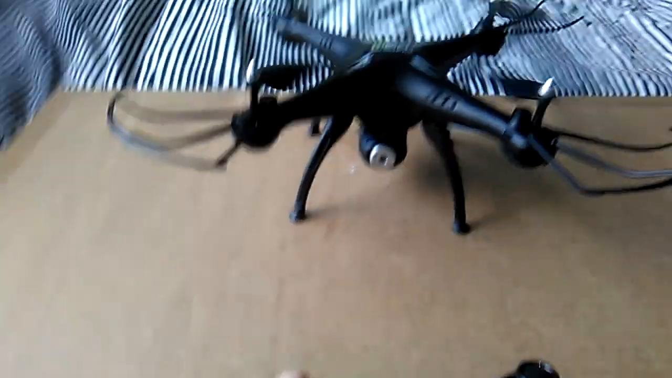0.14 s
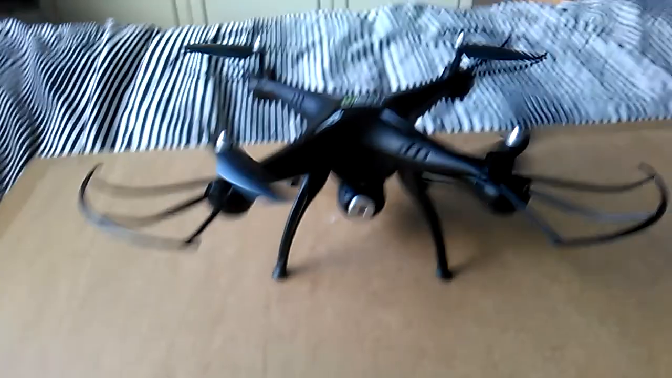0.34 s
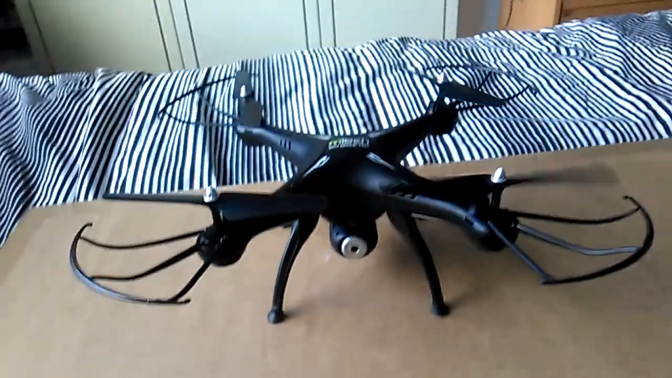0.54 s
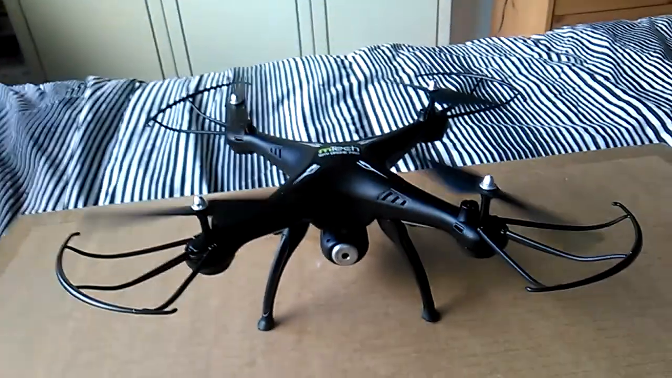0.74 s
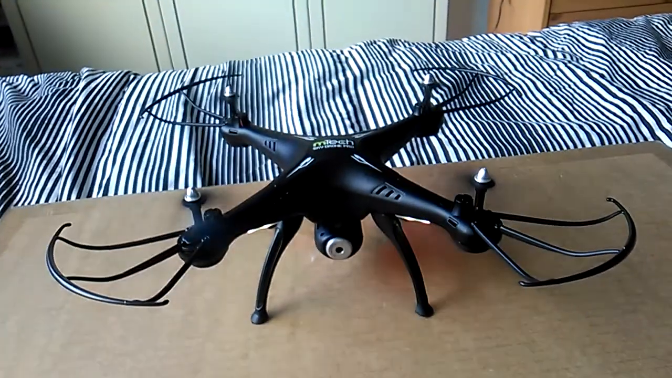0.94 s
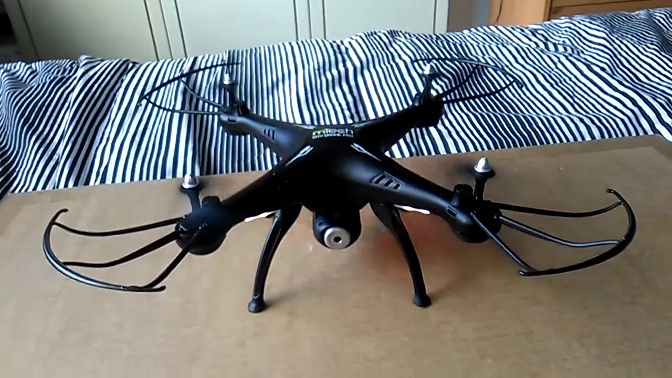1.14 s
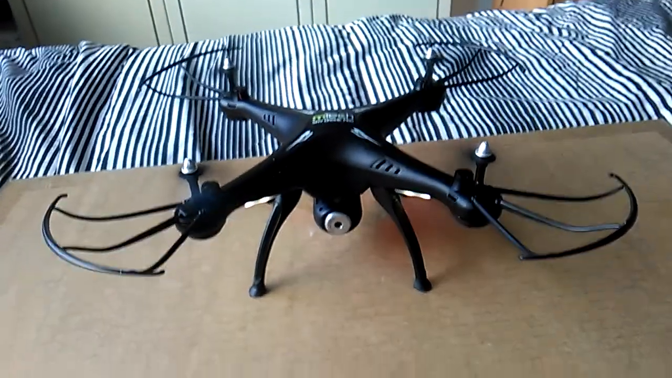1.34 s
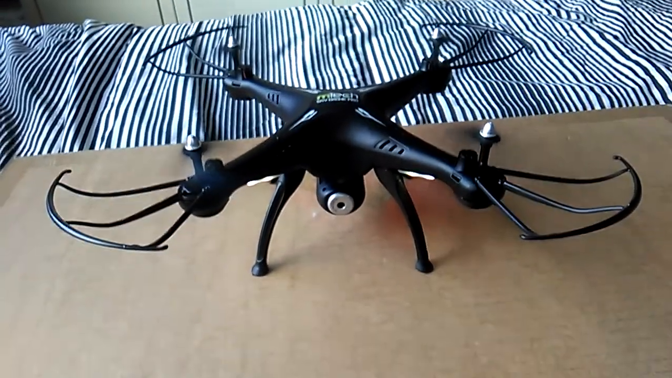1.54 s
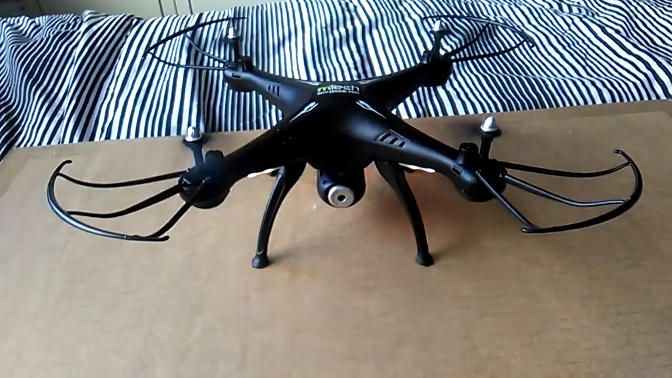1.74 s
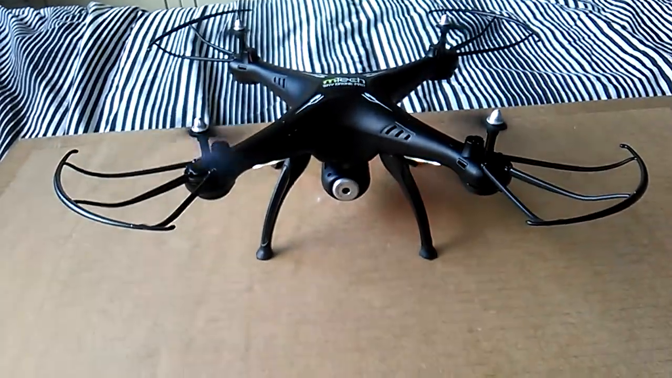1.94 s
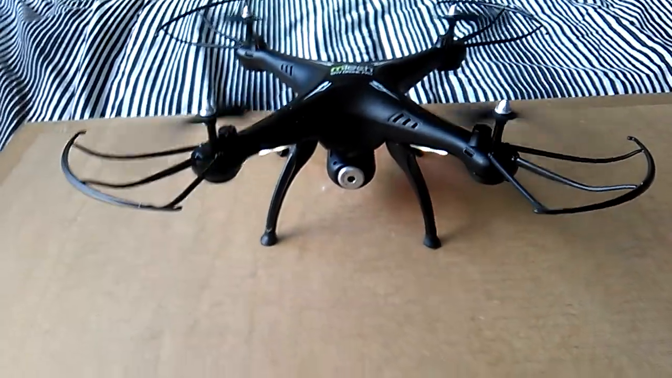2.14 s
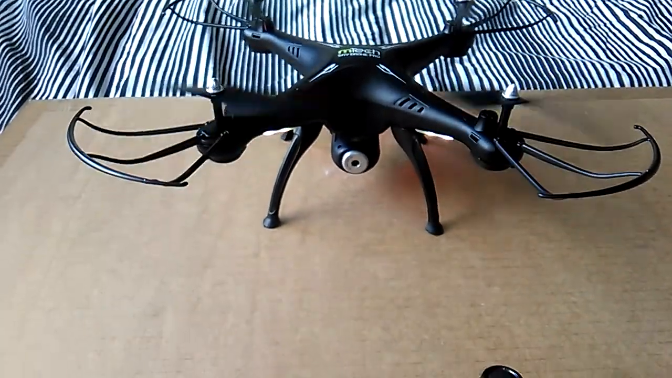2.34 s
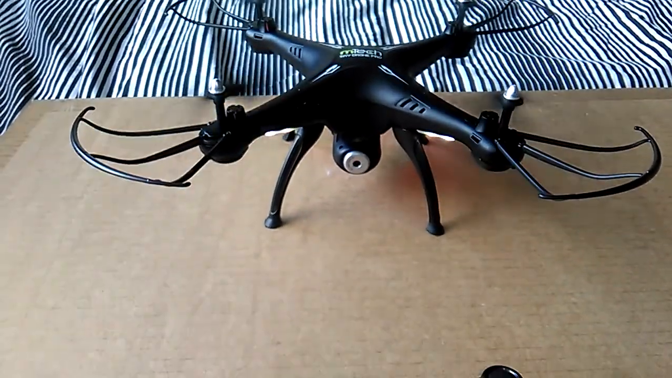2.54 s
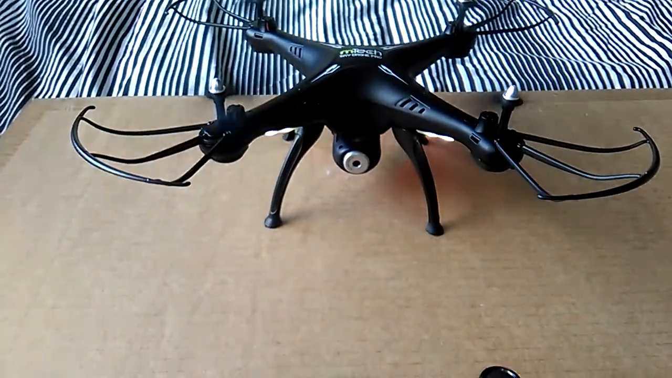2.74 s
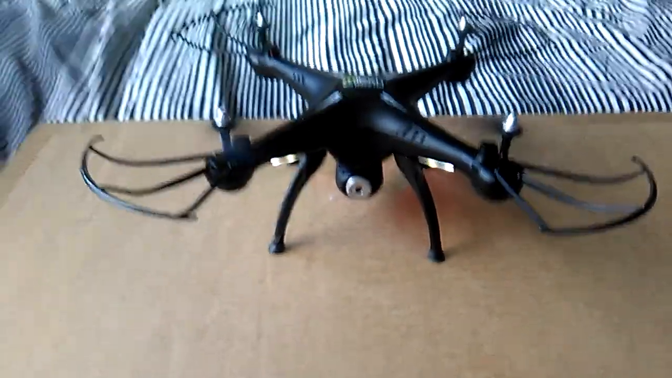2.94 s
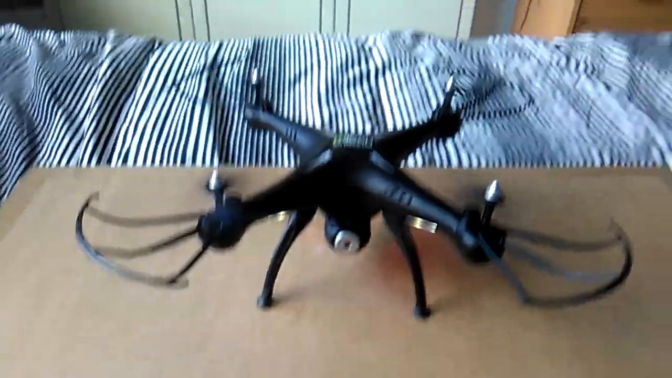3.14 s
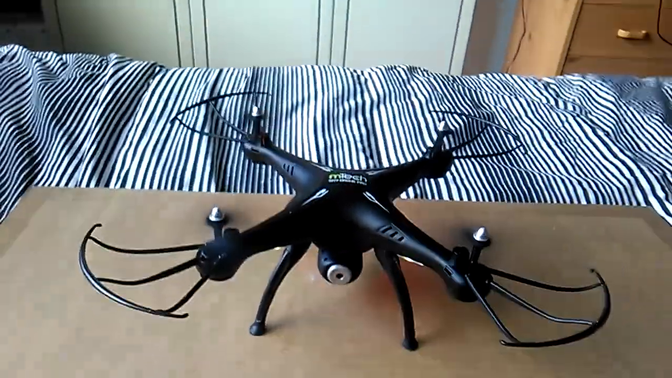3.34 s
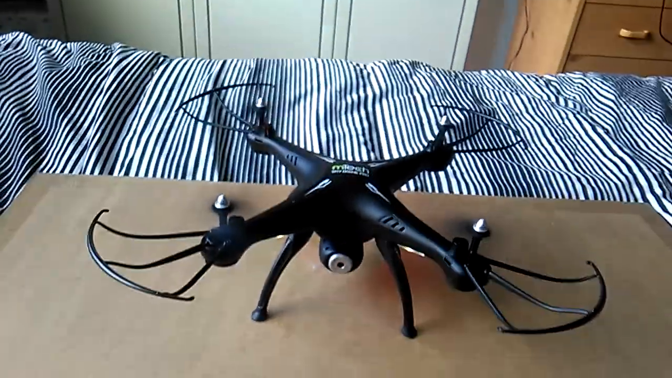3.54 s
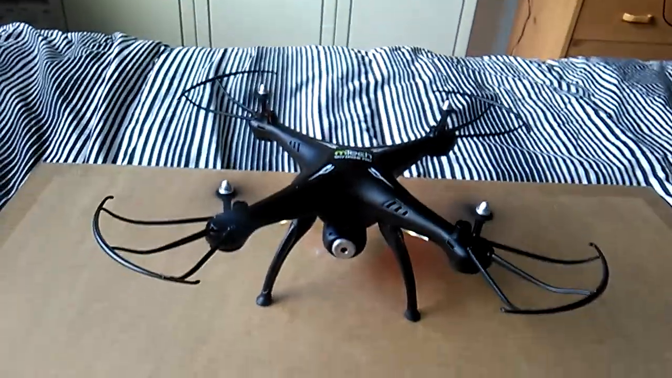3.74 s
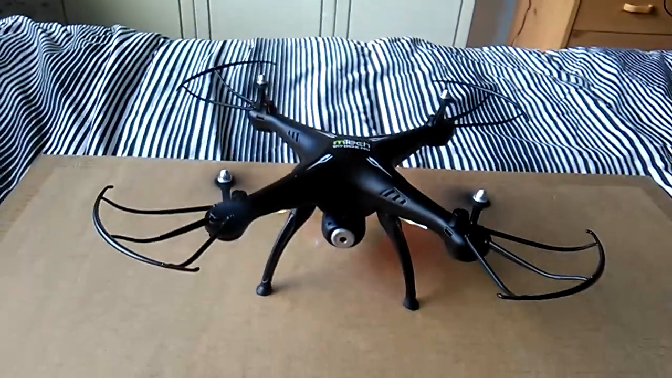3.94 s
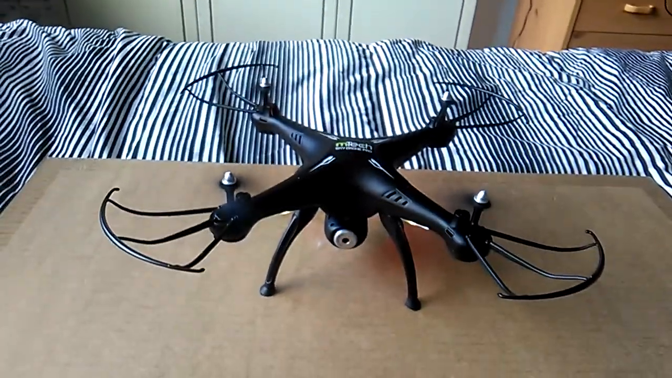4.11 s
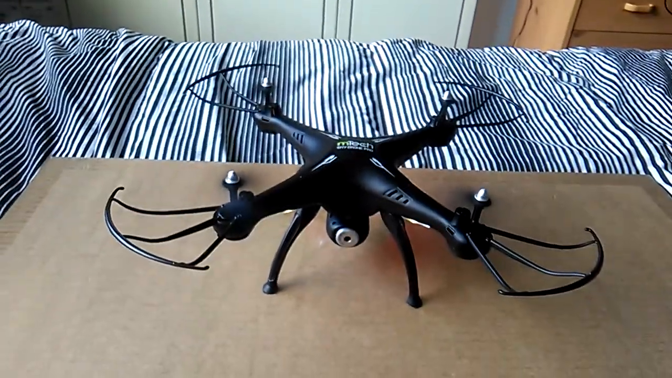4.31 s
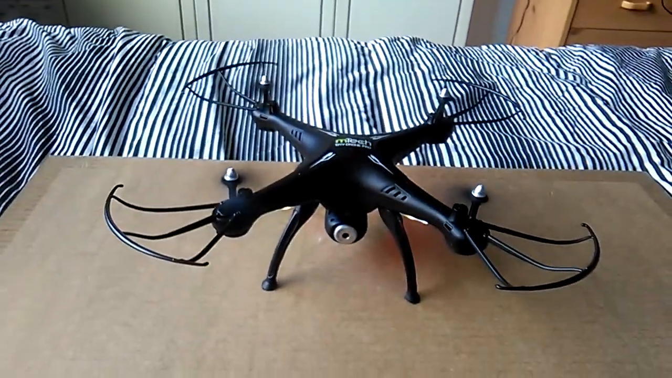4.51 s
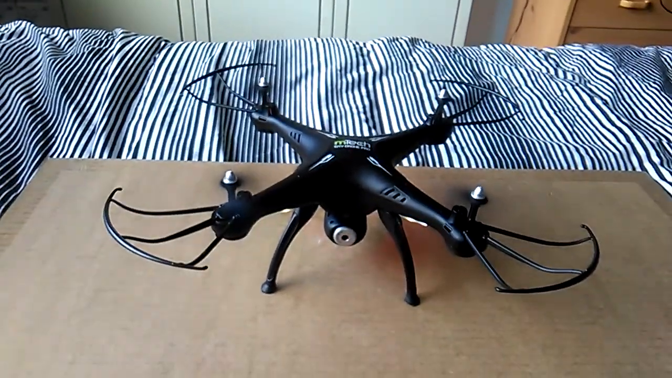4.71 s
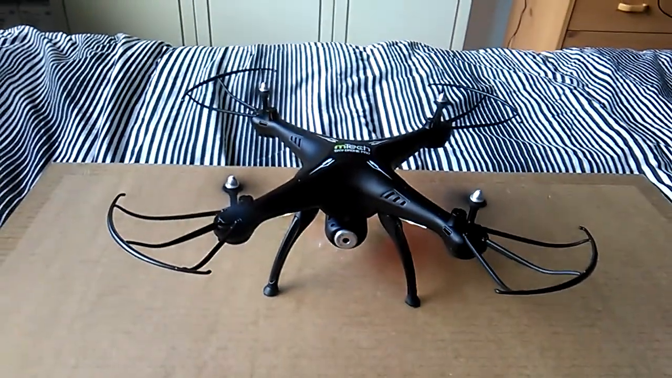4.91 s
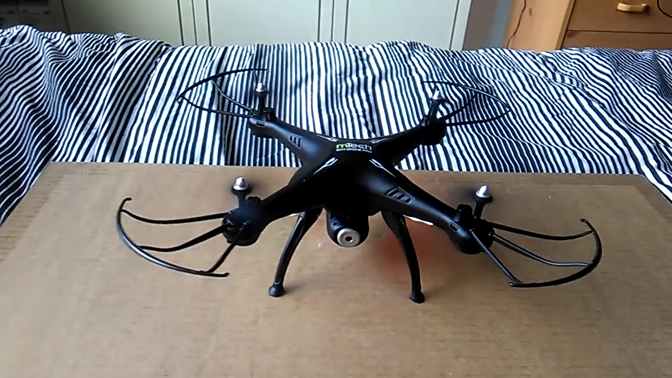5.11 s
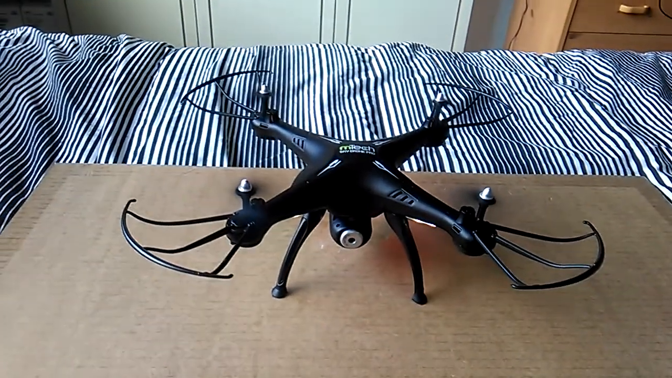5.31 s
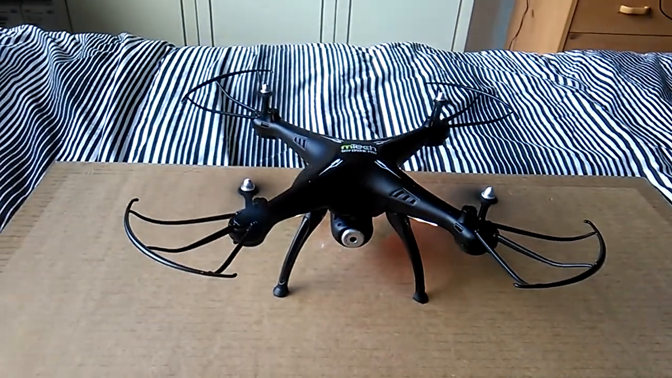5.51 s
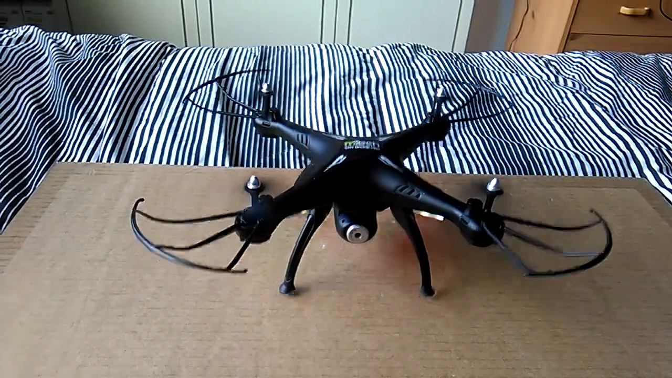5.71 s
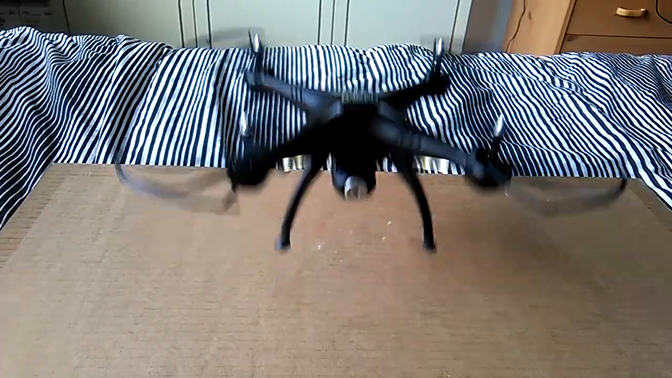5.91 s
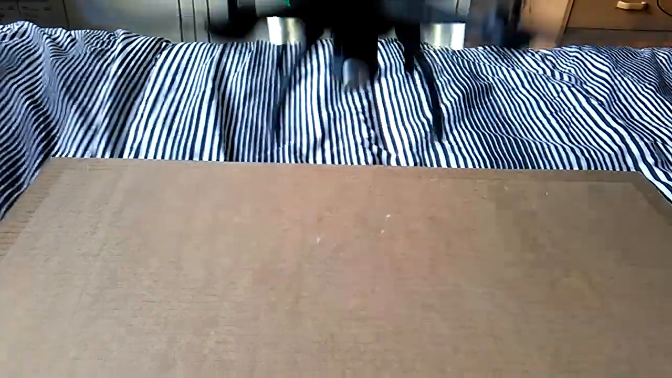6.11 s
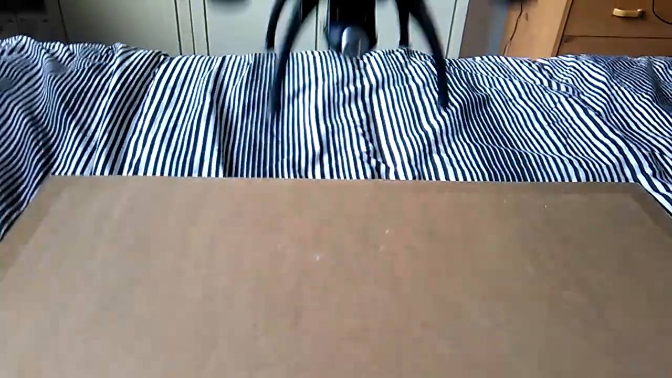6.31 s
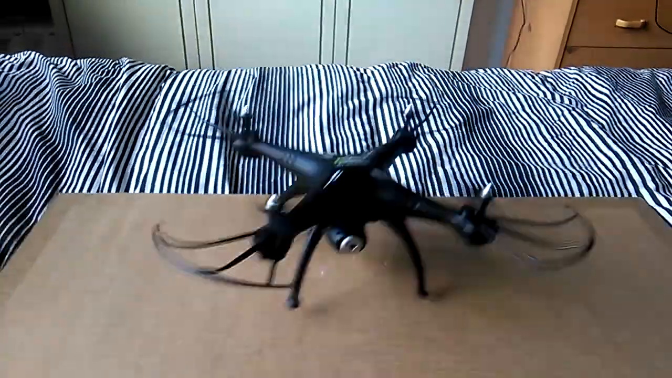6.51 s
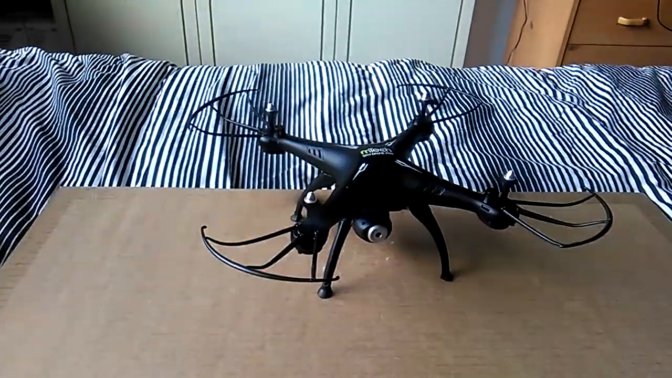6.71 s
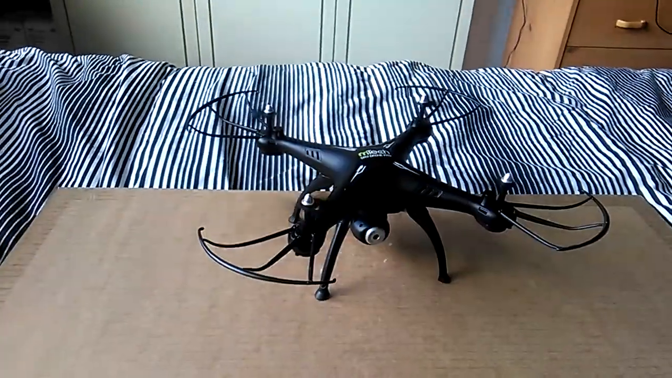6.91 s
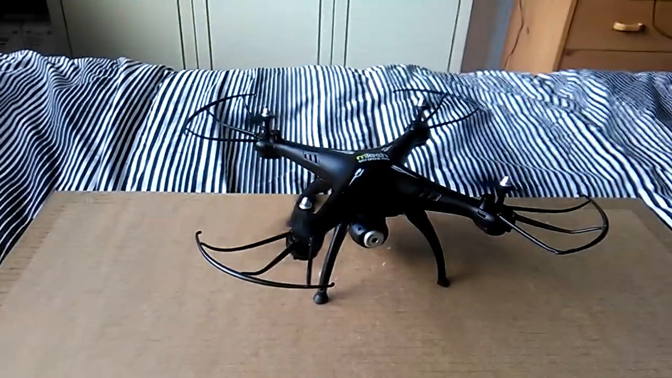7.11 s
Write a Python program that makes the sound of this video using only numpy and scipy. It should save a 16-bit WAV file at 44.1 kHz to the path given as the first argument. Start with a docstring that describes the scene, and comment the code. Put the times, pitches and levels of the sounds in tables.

```python
"""A toy quadcopter on a cardboard sheet, close to a phone: four small geared motors coast down, rev three times,
lift it off and drop it back. Gear teeth are uneven noise and their whine is sines on shaft multiples, both
coloured by the plastic frame; the blades hum and hiss. The sheet's modes rumble under the feet until they
leave it, and the landing is a run of noise bursts that ring those modes. Downwash and a faint hush lie below."""
import sys
import numpy as np
from scipy import signal
from scipy.fft import rfft, irfft
from scipy.io import wavfile
from scipy.ndimage import uniform_filter1d

SR = 44100
rng = np.random.default_rng(int(sys.argv[2]) if len(sys.argv) > 2 else 0)


def linear_from_db(decibels):
    """Turn decibels (scalar or array-like) into linear amplitude factors; 0 gives 1."""
    return 10 ** (np.asarray(decibels, float) / 20)


def wrap_up_sound(samples):
    """Save the sound to the file named by the first command line argument, as 16-bit audio."""
    columns = np.atleast_2d(samples).T
    # keep every value between -1 and 1, then stretch to whole-number steps
    tamed = np.clip(columns, -1, 1)
    steps = np.round(tamed * 32767).astype(np.int16)
    wavfile.write(sys.argv[1], SR, steps)


N = 315519
T = np.arange(N) / SR
LIFT_OFF_S, TOUCHDOWN_S = 6.08, 6.596
COASTING_DB = -15  # drive level without power

# single gear ticks, most as the gears slow or start, one in the third rev, one after touchdown,
# relative levels: start_s, tooth_db, sheet_knock_db
TICKS = [(0.036, -44, -30.5), (0.129, -34, -52), (0.169, -36, -37), (0.237, -34, -28), (0.3238, -42, -37),
         (0.399, -41, -55), (0.419, -44, -50), (0.461, -44, -60), (0.536, -37.5, -52), (0.589, -42, -63),
         (0.622, -51, -70), (0.657, -41, -67), (0.839, -27, -39.5), (0.845, -32, -53), (0.883, -31, -50),
         (2.358, -43, -55), (2.386, -32, -40), (2.419, -29, -58), (2.4944, -43, -60), (2.56, -29, -42),
         (5.2915, -13, -49), (6.787, -22, -49)]


def unit(x):
    """Scale to rms 1."""
    return x / np.sqrt(np.mean(x ** 2))


def along(table):
    """Columns of a curve over time, sample by sample."""
    s, *columns = np.transpose(table)
    return [np.interp(T, s, c) for c in columns]


def on_log(table):
    """A (Hz, value) table read at every FFT bin."""
    hz, value = np.transpose(table)
    return np.interp(np.log(np.fft.rfftfreq(N, 1 / SR) + 1), np.log(hz), value)


def by_speed(blade_hz, table):
    """A (blade rate Hz, dB) table read at the present speed."""
    hz, db = np.transpose(table)
    return np.interp(np.log(blade_hz), np.log(hz), db)


def law(blade_hz, cruise_db, db_per_doubling):
    """Level in dB that changes by a fixed step each time the speed doubles, from a cruise of 70 Hz."""
    return cruise_db + db_per_doubling * np.log2(blade_hz / 70)


def peaks(modes):
    """Complex response of a set of (Hz, width Hz, dB) resonances."""
    f = np.fft.rfftfreq(N, 1 / SR)
    return sum(linear_from_db(db) * 1j * f * w / (hz ** 2 - f ** 2 + 1j * f * w) for hz, w, db in modes)


def shape(x, gain):
    """Filter by a response over the FFT bins."""
    return irfft(rfft(x) * gain, N)


def noise(gain):
    """White noise through a response, scaled to rms 1."""
    return unit(shape(rng.standard_normal(N), gain))


def walk(rate):
    """Random levels of about unit rms, a new one every 1 / rate s, joined by straight slopes."""
    knots = rng.standard_normal(int(N / SR * rate) + 2)
    return 1.2 * np.interp(T * rate, np.arange(len(knots)), knots)


def blows(rows, length_s):
    """A noise burst at each (s, dB), falling by a factor e every length_s."""
    out, t = np.zeros(N), np.arange(int(0.026 * SR)) / SR
    for (s, db), burst in zip(rows, rng.standard_normal((len(rows), len(t)))):
        i = int(s * SR)
        out[i:i + len(t)] += linear_from_db(db) * burst * np.exp(-t / length_s)
    return out


def ring(x, modes):
    """Decaying (Hz, dB, t60 s) modes driven by x."""
    out = np.zeros(N)
    for hz, db, t60 in modes:
        pole = np.exp((2j * np.pi * hz - np.log(1000) / t60) / SR)
        out += linear_from_db(db) * signal.lfilter([1], [1, -pole], x).imag
    return out


def room_hush():
    """Soft, dark noise, independent at the two ports."""
    tone = [(60, -8), (200, 7), (1000, -6), (5000, -14), (8000, -22), (10500, -40), (12000, -55)]
    return linear_from_db(-74) * unit(shape(rng.standard_normal((2, N)), linear_from_db(on_log(tone))))


def downwash():
    """Deep rumble, probably downwash on the microphone; the sheet's boom after touchdown shares its noise."""
    # rumble before its slow drift: time_s, level_db
    wash_curve = [(0, -70), (.64, -69), (.7, -81), (1.0, -74), (1.62, -67), (2.28, -78), (3.2, -64),
                  (4.18, -52), (4.8, -57), (5.04, -49), (5.86, -54), (6.13, -57), (6.55, -58), (6.8, -72)]
    boom_db, boom_hold_s, boom_t60_s = -44, 0.1, 0.26
    after = T - TOUCHDOWN_S
    boom = (after > 0) * linear_from_db(boom_db - 60 * np.maximum(after - boom_hold_s, 0) / boom_t60_s)
    level = linear_from_db(along(wash_curve)[0] + 2.5 * walk(8)) + boom
    return level * noise(peaks([(55.4, 8.7, 15), (40.3, 26, -14)]) ** 2)


def part_ring():
    """A loose part buzzes on briefly once the gears have slowed: narrow noise bands that decay."""
    # loose part's bands: pitch_hz, level_db, t60_s
    part_modes = [(4420, -73, .5), (4743, -63, .3)]
    start_s, rise_s = 0.67, 0.006
    t = np.maximum(T - start_s, 0)
    rise = np.clip((T - start_s) / rise_s, 0, 1)
    bands = [linear_from_db(db - 60 * t / t60) * noise(peaks([(hz, 45, 0)]) ** 2) for hz, db, t60 in part_modes]
    return rise * sum(bands)


def clatter():
    """Guards and legs rattle after touchdown: mid-heavy noise that jitters as it decays."""
    start_db, t60_s = -18.5, 0.54
    after = T - TOUCHDOWN_S
    level = (after > 0) * linear_from_db(start_db - 60 * np.maximum(after, 0) / t60_s + 2.5 * walk(250))
    return level * noise(linear_from_db(on_log([(90, -5), (200, -1), (900, 6.5), (2000, -0.5), (5000, -6.0), (12000, -55)])))


def landing():
    """Feet thump the sheet into its modes, with a short crack of plastic and a clatter."""
    # feet meeting the sheet, relative levels: start_s, foot_db, crack_over_foot_db
    contacts = [(5.174, -22.5, -10), (6.5975, -4.5, -6.5), (6.603, -11, -15), (6.61, -8.5, -14),
                (6.617, -8, -18), (6.624, -12.5, -18), (6.631, -16, -20), (6.639, -15, -33),
                (6.661, -19, -22), (6.695, -21, -37), (6.708, -12, -30), (6.714, -17.5, -25),
                (6.722, -21, -25), (6.734, -23, -25), (6.749, -24, -30), (6.775, -28, -30),
                (6.869, -32, -27), (6.889, -37, -27), (7.094, -46, -33)]
    # sheet modes under the blow, relative levels: pitch_hz, level_db, t60_s
    thump_modes = [(71.6, -1, 0.2), (120, 1, 0.11), (206, -2, 0.12), (100, -8, 0.13), (332, -3, 0.066),
                   (443, -1, 0.11), (642, 7.5, 0.06), (740, 7.5, 0.065), (864, 7.5, 0.05),
                   (1026, 6.5, 0.04), (1280, -3, 0.04), (1583, -8, 0.072), (2200, -6, 0.093),
                   (2630, -16, .04)]
    feet_rows = [row[:2] for row in contacts]
    feet = blows(feet_rows, 0.0022)
    push = np.abs(blows(feet_rows, 0.00023))  # one-way, so it drives the low modes
    thump = 0.026 * ring(0.53 * feet + 0.8 * push, thump_modes)
    # the thump keeps little of its deepest bass, below about 60 Hz
    thump = shape(thump, linear_from_db(on_log([(35, -30), (60, -3), (75, 0), (20000, 0)])))
    crack = blows([(s, db + rel) for s, db, rel in contacts], 0.0027)
    crack = shape(crack, linear_from_db(on_log([(800, -19), (1600, 7.0), (3000, 10.0), (8000, -4.0), (15000, -16)])))
    return clatter() + thump + crack


def sheet_rumble(rattles, lead_hz):
    """Feet pass the shaking to the sheet: slow gears ring its modes, downwash at speed drums it broadly."""
    # rumble, which stops while the feet are off the sheet: time_s, relative_level_db
    rumble_curve = [(0, -45.5), (.24, -46.5), (.832, -70), (.838, -52.5), (.95, -38.5), (1.1, -34.5),
                    (1.74, -39.5), (2.38, -46), (2.53, -51.5), (2.67, -40), (4.06, -39), (4.13, -38),
                    (5.98, -39), (6.3, -67), (6.59, -83), (6.6, -17), (6.72, -37.5), (6.81, -47),
                    (7.15, -47.5)]
    # sheet resonances: pitch_hz, width_hz, relative_level_db
    sheet_modes = [(63.4, 13, -10), (162, 17, 6.5), (227, 26.3, 7), (507.8, 18.3, 3.5), (730, 18, -32)]
    level_db = along(rumble_curve)[0] + 2.0 * walk(16)
    rung = unit(shape(rattles.sum(0), peaks(sheet_modes)))
    drummed = noise(linear_from_db(on_log([(60, -61), (130, -3.5), (300, 2.5), (800, 9.5), (1400, 2.0), (2600, -53)])))
    share = np.clip(lead_hz / 560, 0, 1)
    return linear_from_db(level_db - 3.5) * (np.sqrt(1 - share) * rung + np.sqrt(share) * drummed)


def sheet_knocks():
    """Each single gear tick also knocks the sheet: a one-way push into two low resonances."""
    push = np.abs(blows([(s, sheet_db) for s, _, sheet_db in TICKS], 0.0013))
    return 30 * shape(push, peaks([(232, 31, -3.5)]) ** 2 + peaks([(153, 10, -14)]))


def arm_tone(rattles, rattle_db, blade_hz):
    """Gear rattle rings the arms in a narrow band, and one arm sings briefly as the frame settles."""
    # arm resonance: pitch_hz, width_hz, level_db
    arm_modes = [(1076.6, 260, 0)]
    on_s, off_s, sing_db, fade_s = 6.805, 6.872, -42, 0.0051
    over_rattle_db = law(blade_hz, -17.5, -2.5) + 1.27 * walk(14)
    rung = linear_from_db(rattle_db + over_rattle_db) * unit(shape(rattles.sum(0), peaks(arm_modes) ** 3))
    gate = np.clip(np.minimum(T - on_s, off_s - T) / fade_s, 0, 1)
    return rung + linear_from_db(sing_db) * gate * noise(peaks([(1099, 73, 0)]) ** 2)


def commutator_buzz(turns, drive_db):
    """Commutators buzz on low multiples of the shaft rates, through an arm resonance."""
    # commutator lines: motor_index, multiple_of_shaft_rate, relative_level_db
    buzz_lines = [(0, 2, 4.5), (1, 3, -1), (0, 5, 6)]
    lines = sum(linear_from_db(db + 2.0 * walk(11)) * np.sin(k * turns[round(m)]) for m, k, db in buzz_lines)
    return shape(linear_from_db(-41.5 + drive_db) * lines, 1.35 * peaks([(1079, 180, 0)]) ** 2)


def shaft_hum(turn, lead_hz, drive_db):
    """A sine at the leading shaft rate, lifted near the sheet's resonances and silent in the air."""
    # lifts by the sheet: pitch_hz, width_hz, relative_level_db
    shaft_peaks = [(232.5, 27.6, 12.6), (140, 14, 2.9)]
    start_hz, air_fade_s = 131, 0.056  # below start_hz the hum fades
    lift = 1 + sum(linear_from_db(db) / (1 + (2 * (lead_hz - hz) / w) ** 2) for hz, w, db in shaft_peaks)
    level = linear_from_db(-46 + drive_db + 2.5 * walk(12)) * lift / (1 + (start_hz / lead_hz) ** 8)
    airborne = np.clip(np.minimum(T - LIFT_OFF_S, TOUCHDOWN_S - T) / air_fade_s, 0, 1)
    return level * (1 - airborne) * np.sin(turn)


def blades(turn, drive_db):
    """One propeller's hum from the turning of its motor shaft; the overtones need load on the blades."""
    # harmonics: multiple_of_blade_rate, relative_level_db
    blade_orders = [(1, 0), (2, -12), (4, -8), (5, -10), (7, -9), (8, -13)]
    hum = np.zeros(N)
    for k, db in blade_orders:
        hum += linear_from_db(db + 1.9 * walk(14) + (k > 1) * drive_db) * np.sin(k * turn / 3 + k * k)
    return hum


def blade_hum(turns, blade_hz, drive_db):
    """Three propellers hum at a level that follows the leading rotor's speed, the leading one loudest."""
    # hum before drive and drift: blade_rate_hz, relative_level_db
    hum_curve = [(20, -88), (70, -63), (108, -46), (132, -42.5), (160, -44), (195, -39)]
    level_db = by_speed(blade_hz, hum_curve) + 0.39 * drive_db + 6.7 * walk(10)
    return sum(linear_from_db(level_db + rel) * blades(turns[m], drive_db) for m, rel in [(0, 0), (3, -8.5), (2, -13.5)])


def blade_hiss(rattle_db, blade_hz, lead_hz, drive_db):
    """Blades hiss as flickering treble noise at both ports; the finest hiss needs fast blade tips."""
    # hiss colour: pitch_hz, relative_level_db
    air_colour = [(3820, 3), (6500, -2), (11400, -8.5), (13100, -14), (14600, -40), (15000, -88)]
    over_rattle_db = law(blade_hz, -24.5, 3.5) + drive_db / 2 + 3.3 * walk(14)
    hiss = shape(rng.standard_normal((2, N)) * linear_from_db(2.0 * walk(300)), linear_from_db(on_log(air_colour)))
    fine = shape(hiss, linear_from_db(on_log([(9500, -42), (11500, -1.5), (20000, 0)])))
    hiss = hiss + fine * (np.clip(lead_hz / 500, 0, 2) ** 1.1 - 1)
    return linear_from_db(rattle_db + over_rattle_db) * unit(hiss)


def mesh_gain(hz):
    """The mesh sings best near 5 kHz and not far above; the gear case lifts the whine near 3280 Hz."""
    case = 0.6 / (1 + (2 * (hz - 3280) / 450) ** 2)
    return (0.8 + 0.8 * (hz / 5000) ** 4 + case) / (1 + (hz / 5500) ** 18)


def gears(shaft_hz, whine_db, orders):
    """One motor: teeth rattle unevenly over each turn; what repeats every turn whines on shaft multiples."""
    unsteady_hz = shaft_hz * (1 + 0.001 * walk(60) + 0.002 * walk(12))
    turn = 2 * np.pi * np.cumsum(unsteady_hz) / SR + rng.uniform(0, 40)
    # the big gear turns once in six and runs off-centre, and one pinion tooth strikes hardest
    wobble = 1 + 0.17 * np.cos(turn / 6)
    knock = 1 + 0.64 * np.exp(2 * (np.cos(turn) - 1))
    # slow gears strike tooth by tooth, fast ones blur
    teeth = linear_from_db(1.85 * walk(700) + 5.5 * walk(140) * np.exp(-shaft_hz / 110))
    rattle = rng.standard_normal(N) * knock * teeth
    # the off-centre gear also hurries and delays the teeth: each line spreads into a cluster, less at full speed
    sway = 0.45 * np.sin(turn / 6) + 0.3 * np.sin(turn / 3)
    sway = sway * np.clip((400 / shaft_hz) ** 2.5, 0, 1)
    whine = np.zeros(N)
    for k, db in orders:
        whine += linear_from_db(db + 2.7 * walk(70)) * mesh_gain(k * shaft_hz) * np.sin(k * turn + k * k + sway)
    return wobble * rattle / 1.09, wobble * linear_from_db(whine_db) * whine, turn


def four_motors(lead_hz, drive_db):
    """Rattle, whine and turning of each motor; the other three keep a changing speed ratio to the leading one."""
    # the other three motors, driven and then falling after power is cut, one table each:
    # time_s, shaft_hz, relative_whine_db
    motor_curves = [
        [(4.04, 235, -12), (4.08, 262, -4), (4.14, 295, -9), (4.2, 320, -9), (4.3, 338, -7), (4.44, 363, -6),
         (4.62, 389, -8), (4.7, 391, -7), (4.88, 387, -7), (4.94, 402, -3), (5.0, 430, -5), (5.05, 455, -11),
         (5.12, 479, -18), (5.26, 320, -22), (5.35, 355, -8), (5.45, 415, -15), (5.65, 477, -24),
         (5.83, 545, -20), (5.93, 557, -8), (6.02, 566, -3), (6.1, 576, 1), (6.17, 588, 2), (6.22, 572, -2),
         (6.26, 525, -10), (6.36, 375, 2), (6.4, 335, 9), (6.43, 300, 4), (6.5, 270, -19)],
        [(4.38, 362, -18), (4.54, 392, -11), (4.7, 405, -8), (4.86, 402, -10), (4.95, 420, -6), (5.06, 478, -8),
         (5.12, 480, -24), (5.78, 535, -24), (5.83, 560, -4), (5.9, 575, 1), (5.95, 582, -1), (6.02, 591, -1),
         (6.08, 598, -2), (6.17, 613, -3), (6.22, 595, -3), (6.26, 545, -3), (6.33, 520, 5), (6.42, 510, 7),
         (6.5, 480, 3), (6.58, 400, -19)],
        [(5.3, 345, -20), (5.38, 395, -8), (5.47, 428, -9), (5.54, 419, -9), (5.7, 421, -8), (5.84, 428, -12),
         (6.05, 430, -12), (6.2, 445, -12), (6.28, 428, -4), (6.35, 422, 4), (6.46, 385, -2), (6.5, 362, 8),
         (6.55, 335, -4), (6.6, 310, -19)],
    ]
    # their gear whine, nine teeth on the pinion: multiple_of_shaft_rate, relative_level_db
    whine_orders = [(7, 6), (8, 14), (9, 16.5), (10, 10), (11, 12), (12, 5)]
    # how clearly the leading motor whines: time_s, relative_level_db
    lead_whine = [(.9, -20), (.99, -4), (1.08, -4), (1.15, -11), (1.35, -16), (1.55, -10), (1.68, -14),
                  (1.76, -18), (2.6, -20), (2.75, -12), (3.0, -9), (3.3, -7), (4.0, -7), (4.12, -17),
                  (4.3, -20), (4.6, -7), (5.1, -16), (5.45, -16), (5.52, -2), (5.66, 3), (5.72, 12),
                  (5.77, 15), (5.83, 14), (5.9, 9), (6.0, 11), (6.1, 14), (6.18, 12), (6.23, 8), (6.3, -24)]
    # leading motor's whine: multiple_of_shaft_rate, relative_level_db
    lead_orders = [(7, -10), (8, -8), (9, 1), (11, -5), (13, 0), (15, 11.5), (16, 10), (17, 9), (18, 10),
                   (19, 13.5), (22, 4)]
    idle_whine_db = -19  # outside each motor's table
    parts = [gears(lead_hz, along(lead_whine)[0] + drive_db, lead_orders)]
    for table in motor_curves:
        s, hz, db = np.transpose(table)
        ratio = np.interp(T, s, hz / np.interp(s, T, lead_hz))
        whine_db = np.interp(T, s, db, left=idle_whine_db, right=idle_whine_db)
        parts.append(gears(ratio * lead_hz, whine_db + drive_db, whine_orders))
    return [np.array(c) for c in zip(*parts)]


def gear_sound(rattles, whines, rattle_db, lead_hz):
    """Rattle and whine through the plastic frame, plus single ticks that ring the gear case."""
    # frame colour: pitch_hz, relative_level_db
    frame_colour = [(760, -59), (1300, -11), (1970, -12.5), (2270, -7), (2650, -3.5), (3250, -1),
                    (4110, -2.5), (4620, -2), (5900, -3), (7500, -14.5), (9750, -27), (16500, -120)]
    # frame resonances: pitch_hz, width_hz, relative_level_db
    frame_modes = [(2318, 54, 1.5), (3275, 780, -3), (4800, 44, -59)]
    # gear case resonances under single teeth: pitch_hz, width_hz, relative_level_db
    case_modes = [(2444, 153, -0.5), (3210, 204, -4.5), (3880, 87, -6), (4590, 180, -6.5)]
    frame = linear_from_db(on_log(frame_colour)) * (1 + peaks(frame_modes))
    norm = np.std(shape(rattles[0], frame)) * 1.57
    # the ports hear two motors' rattle each
    pair = np.array([rattles[0] + rattles[1], rattles[2] + rattles[3]])
    # faster gears sound brighter
    upper = shape(pair, linear_from_db(on_log([(3000, -15), (4200, -3.0), (9000, 3.0)])))
    pair = pair + upper * (np.clip(lead_hz / 300, 0.1, 3) ** 0.5 - 1)
    whine = whines.sum(0)
    pair = pair + 0.12 * np.array([whine, 0.48 * np.roll(whine, -3)])
    # slow gears go more through the case than the frame
    slow = np.exp(-lead_hz / 130)
    body = shape(linear_from_db(rattle_db) * np.sqrt(1 - 1.08 * slow) * pair, frame) / norm
    ticks = np.array([blows([row[:2] for row in TICKS], 0.0066) for _ in range(2)])
    case = peaks(case_modes) * linear_from_db(on_log([(800, -35), (1700, -3.0), (5000, -4), (7000, -5), (12000, -21)]))
    return body + shape(1.86 * linear_from_db(rattle_db) * np.sqrt(slow) * pair + 2.16 * ticks, case)


def power_db():
    """0 dB while the motors are driven, lower while they coast."""
    # spans under power: on_s, off_s
    power_spans = [(.834, 1.76), (2.558, 5.15), (5.28, 6.27)]
    on_fade_s, off_fade_s = 0.004, 0.067
    on = 0
    for a, b in power_spans:
        on = on + np.clip(np.minimum((T - a) / on_fade_s, (b - T) / off_fade_s) + 0.5, 0, 1)
    return COASTING_DB * (1 - on)


def drone():
    """Four motors share one speed curve: gears and hiss as a pair for the two ports, the low sounds as one."""
    # speed of the leading rotor: time_s, blade_rate_hz
    speed_curve = [(0, 29), (.61, 12), (.83, 12), (.965, 49), (1.02, 66), (1.084, 78.5), (1.144, 90.4),
                   (1.18, 90), (1.486, 73), (1.8, 47), (2.5, 20), (3.126, 62.5), (3.2, 67.2), (3.6, 70.3),
                   (4.04, 69.6), (4.19, 102.3), (4.418, 121), (4.52, 128.3), (4.814, 134.7), (4.886, 134),
                   (5.058, 159.4), (5.148, 154.8), (5.25, 102.5), (5.46, 144), (5.536, 155), (5.698, 162.7),
                   (5.805, 184.5), (6.0, 186.5), (6.112, 191.5), (6.174, 196), (6.386, 124), (6.54, 77.4),
                   (7.15, 25)]
    # gear rattle: time_s, relative_level_db
    rattle_curve = [(0, -49), (.25, -53), (.55, -63.5), (.832, -84), (.836, -48), (.88, -45), (.98, -26),
                    (1.06, -23.5), (1.14, -21.5), (1.55, -24), (1.74, -25.5), (2.38, -39.5), (2.555, -48.5),
                    (2.56, -47), (2.6, -38.5), (2.72, -29.5), (2.99, -25.5), (4.06, -25), (4.14, -21),
                    (5.09, -20), (5.22, -22.5), (5.37, -20), (6.19, -20), (6.3, -23.5), (6.62, -26),
                    (6.8, -31), (7.15, -47)]
    blade_hz = uniform_filter1d(along(speed_curve)[0], SR // 25)
    lead_hz = 3 * blade_hz  # shaft rate: two blades, geared six to one
    drive_db = power_db()
    # unloaded gears chatter unevenly
    rattle_db = along(rattle_curve)[0] + 0.8 * drive_db / COASTING_DB * walk(110)
    rattles, whines, turns = four_motors(lead_hz, drive_db)
    pair = gear_sound(rattles, whines, rattle_db, lead_hz)
    pair = pair + blade_hiss(rattle_db, blade_hz, lead_hz, drive_db)
    low = blade_hum(turns, blade_hz, drive_db) + shaft_hum(turns[0], lead_hz, drive_db)
    low = low + arm_tone(rattles, rattle_db, blade_hz) + commutator_buzz(turns, drive_db)
    return pair, low + sheet_rumble(rattles, lead_hz) + sheet_knocks()


def scene():
    """Machine, downwash, landing and a hushed room, spread over two microphone ports."""
    # balance of the ports: pitch_hz, left_minus_right_db
    port_balance = [(60, -9.5), (110, 3.5), (200, -2), (380, 0.5), (690, -0.5), (1280, 5.5), (2360, 4.5),
                    (4360, 12.5), (5800, -1), (8040, -12), (14800, -13.5)]
    # power the right port shares with the left: pitch_hz, likeness (0 to 1)
    likeness = [(30, .97), (300, .93), (640, .7), (1400, .3), (3000, .04), (6000, .01)]
    (first, second), low = drone()
    near = low + downwash() + landing() + part_ring()
    alike = np.clip(on_log(likeness), 0, 1) ** 0.5
    tilt = linear_from_db(on_log(port_balance) / 2)
    # a later copy off the walls makes the near sounds differ a little between the ports
    other = second + np.roll(near, int(0.011 * SR))
    left = shape(first + near, tilt)
    right = shape(first + near, alike / tilt) + shape(other, np.sqrt(1 - alike ** 2) / tilt)
    return np.array([left, right]) + room_hush()


def band_limit(x):
    """A steep low-pass at the top of the band."""
    return signal.sosfilt(signal.butter(12, 15430, fs=SR, output="sos"), x)


def record(dry):
    """The phone drops the deepest bass, rounds the loudest peaks and cuts the top."""
    bottom = signal.butter(2, 40, "high", fs=SR, output="sos")
    top = signal.ellip(8, 0.2, 60, 14200, fs=SR, output="sos")
    rounded = np.tanh(0.78 * signal.sosfilt(bottom, dry)) / 0.79
    return band_limit(signal.sosfilt(top, rounded))


dry = scene()
out = record(dry)
wrap_up_sound(out)
```